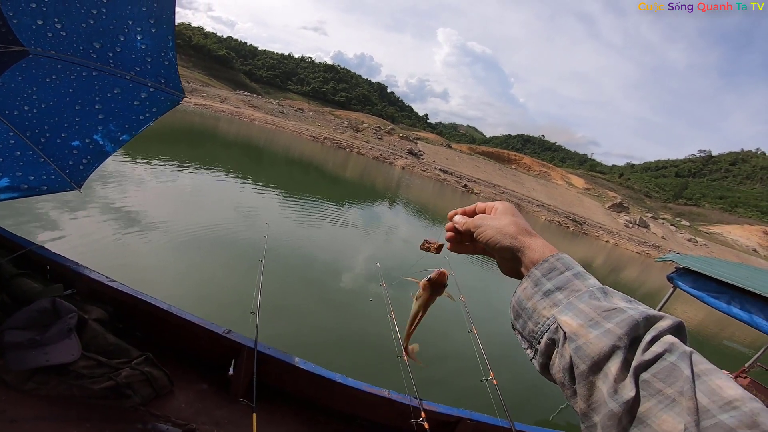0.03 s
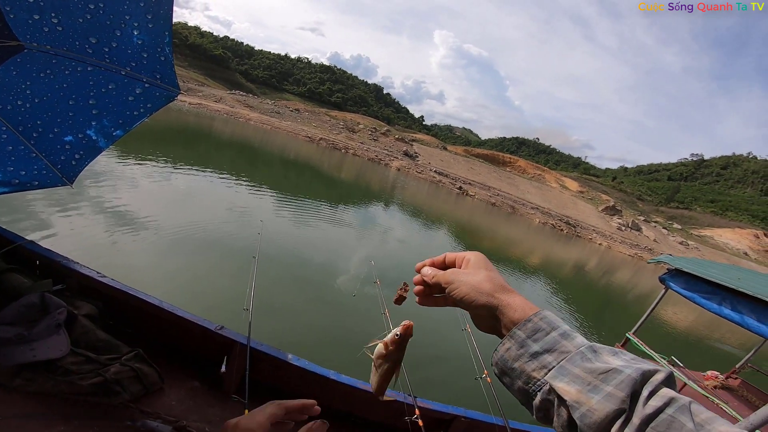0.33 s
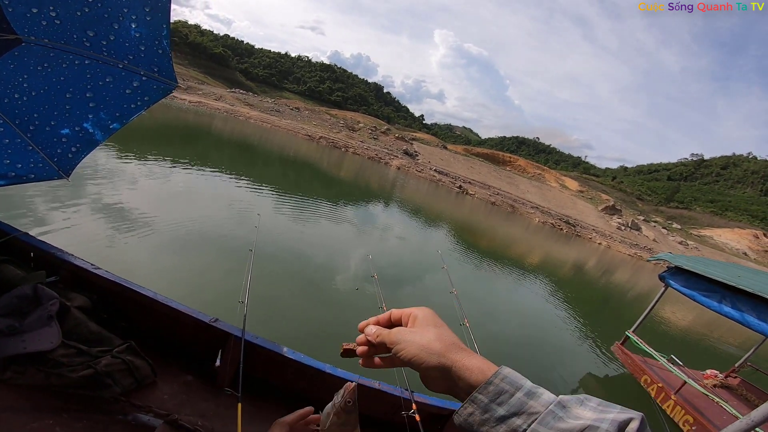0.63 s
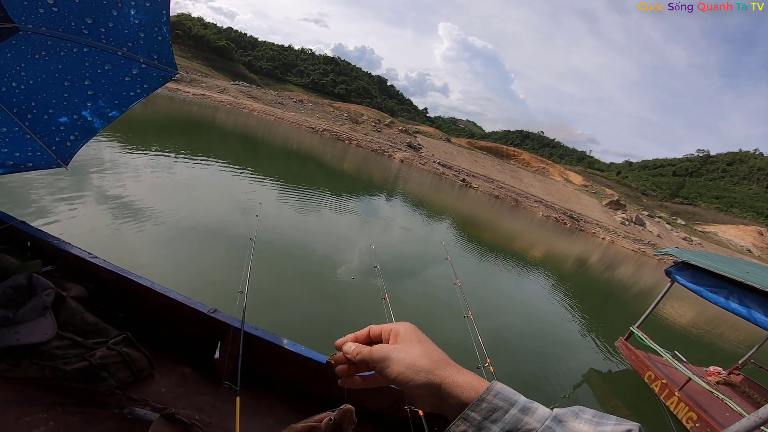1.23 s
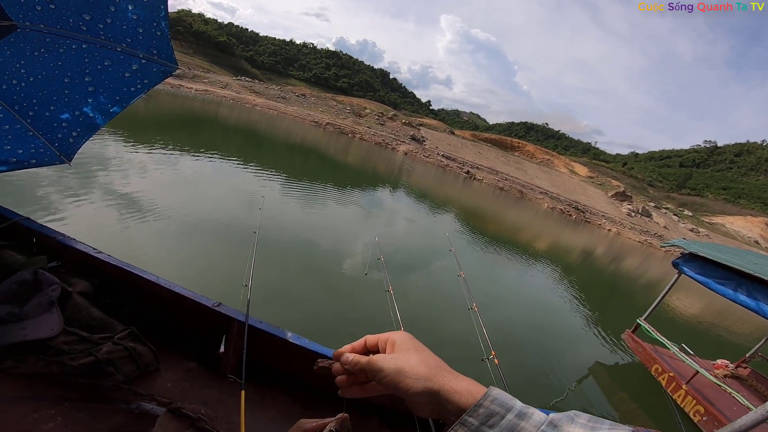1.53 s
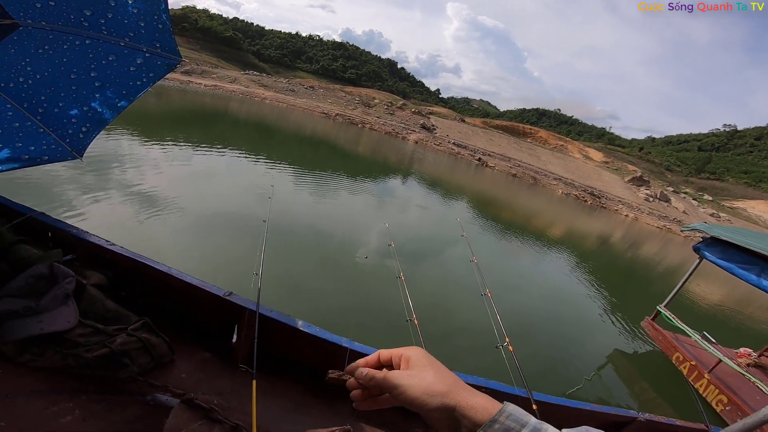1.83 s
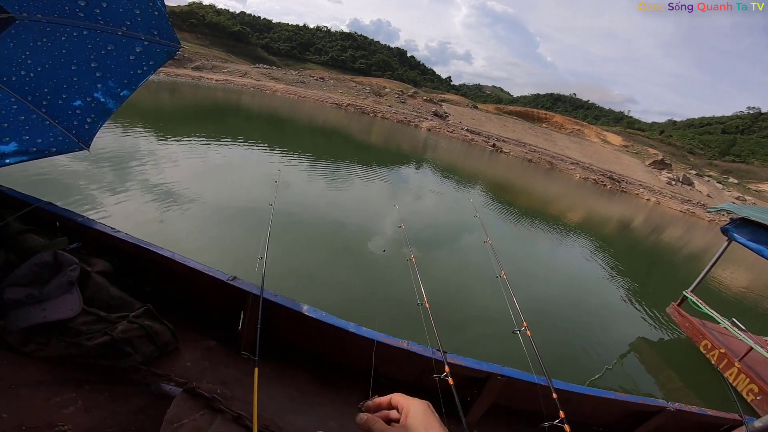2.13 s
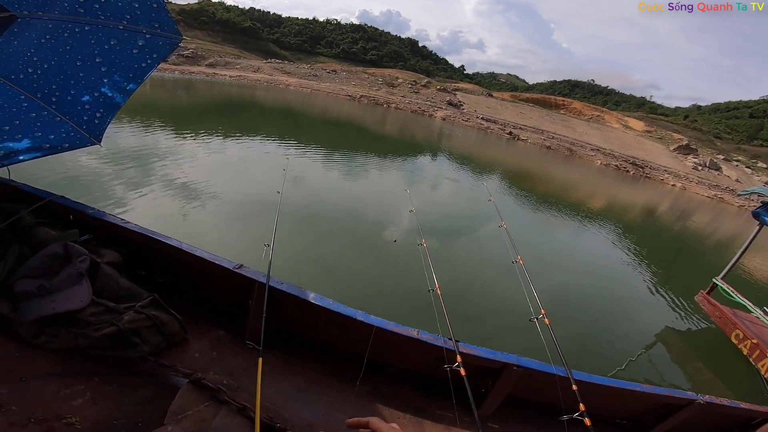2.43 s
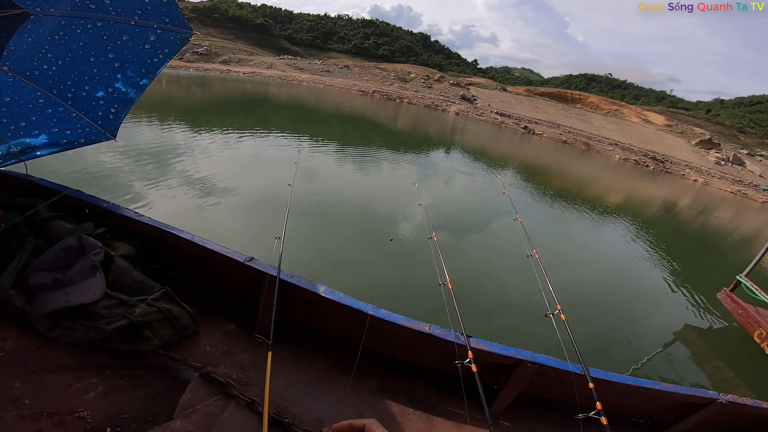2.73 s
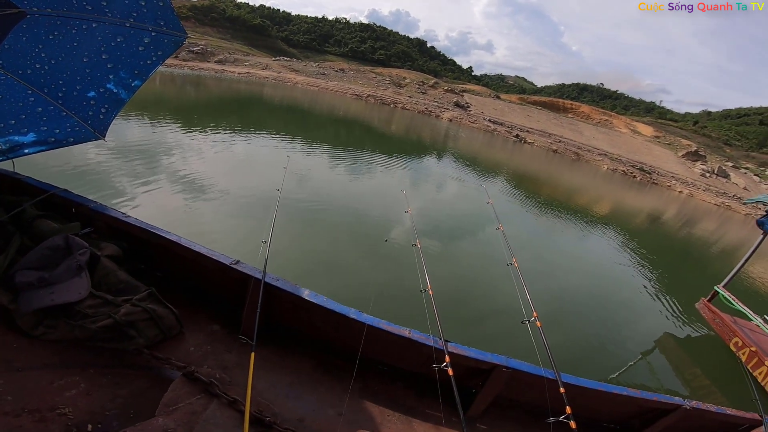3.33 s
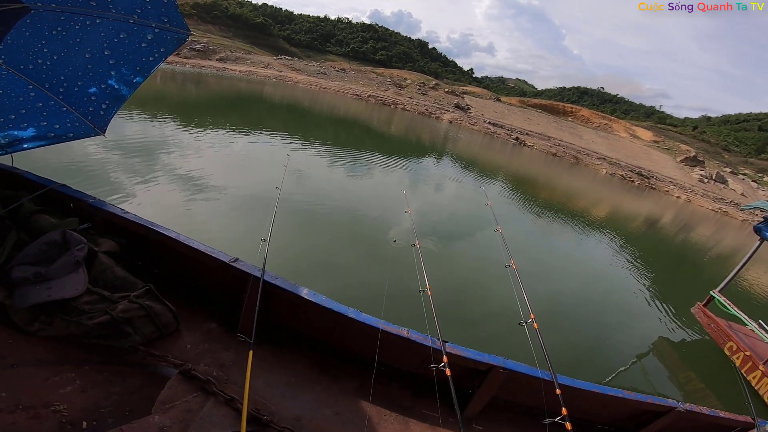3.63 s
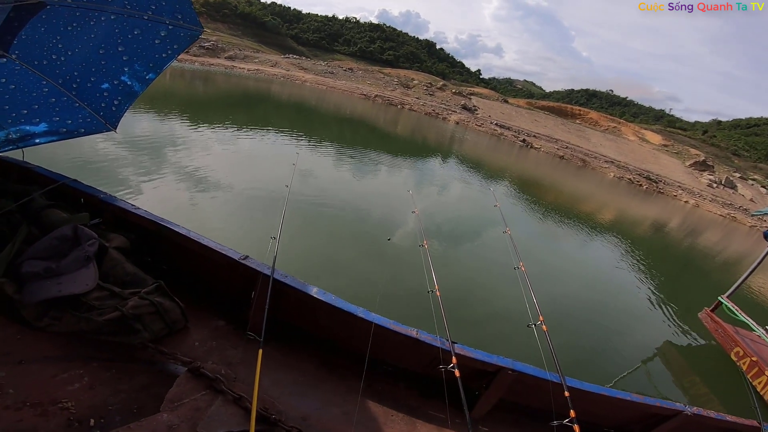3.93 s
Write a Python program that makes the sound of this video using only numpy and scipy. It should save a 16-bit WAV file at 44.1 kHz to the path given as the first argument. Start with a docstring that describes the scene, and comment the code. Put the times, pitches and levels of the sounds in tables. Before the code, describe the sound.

Short raspy croaks from a small catfish in hand, with wet finger ticks between.

```python
"""Light air, soft gusts and far insects surround a boat moored on a still reservoir.
A sleeve swishes, then a small catfish, just landed, slaps into the palm with a dull bump.
From 1.4 s it croaks seven times: each stroke of a fin spine drags ridges over their socket,
and the clicks ring its body. Fingers tick on the wet fish between and over the croaks."""
import sys
import numpy as np
from scipy import signal
from scipy.fft import rfft, irfft
from scipy.io import wavfile
from scipy.ndimage import uniform_filter1d

SR = 44100
rng = np.random.default_rng(int(sys.argv[2]) if len(sys.argv) > 2 else 0)


def int16_out(signal):
    """Quantize to a 16-bit WAV file."""
    q = np.round(np.clip(np.atleast_2d(signal).T, -1, 1) * 32767)
    wavfile.write(sys.argv[1], SR, q.astype(np.int16))


N = 176400

# spine strokes: start_s, swell_s, hold_s, level_db, first_rate_hz, loaded_rate_hz, last_rate_hz,
# body_pitch_hz, grip_damping_db, snap_db, skid_db
CROAK_STROKES = [(1.4015, 0.029, 0.01, 0, 225.5, 222.2, 334.5, 1014, 3.5, -3, -17),
                 (1.758, 0.028, 0.027, 0, 279, 226.4, 312.8, 982, 2.5, -4.5, -10.5),
                 (2.0034, 0.041, 0.028, 3, 288.8, 195.9, 320.6, 1068, 3, -7.5, -43),
                 (2.363, 0.042, 0.028, -1, 277.2, 205.7, 295.4, 1093, -1.5, 0, -18),
                 (2.6568, .041, .036, -2.5, 284.4, 202.5, 257, 1073, -1.3, 1.5, -20.5),
                 (3.1119, 0.041, 0.036, -1, 222.6, 206.7, 252.7, 1057, 0.5, -1.5, -10),
                 (3.7117, 0.038, .034, 0, 230.6, 200.4, 246.2, 1084, 1, -1.5, -14)]
# hollow ring of the fish's body when pitched at BODY_HZ: freq_hz, gain_db
BODY_RING = [(150, -50), (400, -17), (580, -17), (740, -13), (880, -1), (1060, 3.5), (1300, -2.5),
             (1550, -10), (1850, -24), (2300, -23.5), (3200, -31.5), (5000, -46), (12000, -68)]
# dry snap of one ridge: freq_hz, gain_db
RIDGE_SNAP = [(1000, -10), (2200, -10.5), (3300, -1.5), (4200, -9.5), (5400, -9.5), (7300, -16.5),
              (8800, -12), (10500, -22), (13000, -32)]
# higher ring of the spine skidding free: freq_hz, gain_db
SKID_RING = [(500, -68), (1200, -33), (1600, -0.5), (1900, 0.5), (2250, -3), (2700, -23), (4000, -22),
             (12000, -48)]
CROAK_DB, BODY_HZ = 10.5, 1080
START_DB, SAG_DB, RELEASE_DB, RELEASE_S, FADE_DB_PER_S = -17.5, -3, -8.5, 0.036, -290
RIDGE_SCATTER_DB, RIDGE_JITTER, SLIP_JITTER = .8, .02, .10
SNAP_DB, SNAP_DECAY_S, EDGE_SOFT_HZ, EDGE_HARD_HZ = -22.5, 0.00045, 5300, 7700
RASP_DB, RASP_DECAY_S = -4, 0.0054


def croak(start, swell, hold, db, first_hz, loaded_hz, last_hz, body_hz, grip_db, snap_db, skid_db):
    """One stroke of the spine: it slows as it presses in, then speeds up and skids as it lets go."""
    pushes, snaps, skids = np.zeros((3, N))
    age = 0
    for timing, strength in rng.standard_normal((40, 2)):  # one click per ridge
        loose = np.clip((age - swell) / hold, 0, 1)
        released_s = max(age - swell - hold, 0)
        press_db = START_DB * max(1 - age / swell, 0) ** 2.43 + SAG_DB * loose ** 2
        fade_db = RELEASE_DB * min(released_s / RELEASE_S, 1) + FADE_DB_PER_S * released_s
        force = undb(press_db + fade_db + RIDGE_SCATTER_DB * strength)
        dry_snap = undb(-5 * loose) * burst(SNAP_DECAY_S, size=512)
        wet_rasp = undb(RASP_DB) * burst(RASP_DECAY_S, size=512)
        # the edge brightens as the spine presses in
        edge_hz = EDGE_SOFT_HZ + (EDGE_HARD_HZ - EDGE_SOFT_HZ) * min(age / swell, 1) ** 2
        pole = np.exp(-2 * np.pi * edge_hz / SR)
        crack = signal.lfilter([(1 - pole) ** 2], [1, -2 * pole, pole ** 2], dry_snap + wet_rasp)
        add(pushes, start + age, np.array([force]))
        add(snaps, start + age, force * crack)
        add(skids, start + age, force * loose * burst(decay_s=0.003, size=256))
        rate_hz = np.interp(age, [swell / 4, swell * .85, swell + hold], [first_hz, loaded_hz, last_hz])
        jitter = RIDGE_JITTER + SLIP_JITTER * loose ** 2
        age += max(1 + timing * jitter, .5) / rate_hz
    # a tighter grip shaves the peak off the body's resonance
    gripped = [(hz, gain - grip_db * np.exp(gain / 7)) for hz, gain in BODY_RING]
    body = ring(pushes, gripped, stretch=body_hz / BODY_HZ)
    snap = undb(SNAP_DB + snap_db) * ring(snaps, RIDGE_SNAP)
    skid = undb(skid_db) * ring(skids, SKID_RING)
    return undb(db) * (body + snap + skid)


# palm and fingers on the fish: start_s, level_db, decay_s, body_send_db, crisp_db, crisp_pitch_hz
TOUCHES = [(.579, 2.5, .009, -32, -2.5, 8300), (.600, -1, 0.024, -29, 9, 4120),
           (1.234, -13, 0.04, -20, 11.5, 3940), (1.968, -1.5, 0.02, -15, -1.5, 7500),
           (2.345, -23, 0.0011, 0, 9.5, 6600), (2.551, -16, .003, 19.5, -6, 3000),
           (3.043, -12, .002, -5, -6, 3020), (3.055, -4.5, 0.011, 4.5, -6, 5070),
           (3.325, -6.5, 0.0027, -7, -7, 3000), (3.336, -3, 0.012, -6, 2, 3900),
           (3.596, -1.5, 0.02, 4, 4, 5630), (3.7115, 3.5, 0.0013, 4.5, 3, 5330)]
# tone of wet skin: freq_hz, gain_db
SKIN_TONE = [(300, -20.5), (1000, -10.5), (1550, -7), (2050, 5), (2600, -19), (4000, -19.5), (13000, -58)]
# crisp edge of a touch when pitched at CRISP_HZ: freq_hz, gain_db
CRISP_EDGE = [(800, -44), (2200, -8.5), (3200, -19.5), (4400, -22.5), (5800, -19), (7200, -27),
              (9300, -40.5), (13000, -61)]
TICK_DB, CRISP_HZ, CRISP_DECAY_S = -9, 5800, 0.012


def wet_ticks():
    """The slap and finger ticks: short wet contacts with a crisp edge; some also ring the body."""
    skin, body, edges = np.zeros((3, N))
    for start, db, decay_s, body_db, crisp_db, crisp_hz in TOUCHES:
        touch = undb(db) * burst(decay_s)
        add(skin, start, touch)
        add(body, start, undb(body_db) * touch)
        edge = np.zeros(N)
        add(edge, start, undb(db + crisp_db) * burst(CRISP_DECAY_S))
        edges += ring(edge, CRISP_EDGE, stretch=crisp_hz / CRISP_HZ)
    return undb(TICK_DB) * (ring(skin, SKIN_TONE) + ring(body, BODY_RING) + edges)


# tone of sliding cloth: freq_hz, gain_db
CLOTH_TONE = [(100, -18), (170, 11), (450, -10.5), (1300, -3.5), (2000, -3), (3500, -9.5), (6500, -21.5),
              (9000, -24.5), (13000, -46.5)]
SLEEVE_DB, SLEEVE_PEAK_S, SLEEVE_RISE_S, SLEEVE_FALL_S = -52.5, .455, .1, .07


def sleeve(t):
    """Cloth slides as the arm comes down: one fluttering swish."""
    from_peak = np.maximum((SLEEVE_PEAK_S - t) / SLEEVE_RISE_S, (t - SLEEVE_PEAK_S) / SLEEVE_FALL_S)
    cloth = noise(CLOTH_TONE, channels=1)[0]
    level = undb(SLEEVE_DB + 1.3 * wander(rate_hz=57.5))
    return cloth * level / (1 + from_peak + from_peak ** 2)


# soft handling bumps: peak_s, width_s, level_db
BUMP_HITS = [(0.623, 0.044, -47.5), (3.077, 0.008, -48), (3.41, 0.022, -55)]
# their dull low end: freq_hz, gain_db
BUMP_TONE = [(20, -15), (38, 8.5), (75, -21), (160, -1), (300, -10.5), (600, -28.5), (2000, -37),
             (8000, -97)]


def handling_bumps(t):
    """Handling makes brief, rounded swells of low rumble."""
    swells = sum(undb(db) * np.exp(-((t - peak) / width) ** 2 / 2) for peak, width, db in BUMP_HITS)
    return noise(BUMP_TONE) * swells


# stereo image at the two microphone ports: freq_hz, left_minus_right_db, left_lead_rad
PORT_IMAGE = [(100, 0, 1.0), (400, -6, 2.7), (700, -3.5, 2.35), (1000, -1.8, 2.15), (2000, -.8, 1.55),
              (3300, -2.5, .9), (5300, -13, 0), (12000, -15, 0)]
# treble scattered around the hands, different on each side: freq_hz, gain_db
SCATTER_TONE = [(500, -45), (1300, -37), (2200, -3.5), (4500, 5.5), (13000, 13)]
HULL_DB, HULL_T60_S, AWNING_DB, AWNING_T60_S = -8.5, 0.12, -33, 0.45
SCATTER_DB, SCATTER_T60_S = -7, .025


def boat_reflections(x):
    """Close sound and hull reflections reach both ports; treble scatters, the awning adds a faint tail."""
    def echo(t60_s):
        return signal.fftconvolve(x, burst(t60_s / np.log(1000), size=16384))[:N]

    near = rfft(x + undb(HULL_DB) * echo(HULL_T60_S))
    balance = undb(curve(PORT_IMAGE) / 2)
    lead_rad = curve(PORT_IMAGE, column=2)
    ports = irfft(np.array([near * balance * np.exp(1j * lead_rad), near / balance]), N)
    scatter = ring(np.array([echo(SCATTER_T60_S) for _ in range(2)]), SCATTER_TONE)
    awning = np.array([echo(AWNING_T60_S) for _ in range(2)])
    return ports + undb(SCATTER_DB) * scatter + undb(AWNING_DB) * awning


# bed of open air: freq_hz, gain_db
AIR_TONE = [(60, -4.5), (85, -15), (115, -20), (152, 6.5), (220, -1.5), (300, -9), (520, -16), (780, -9),
            (1050, -17), (2000, -21), (3600, -25.5), (5200, -26.5), (6500, -34), (10000, -39),
            (11200, -60.5)]
# wind rumble on the ports: freq_hz, gain_db
WIND_TONE = [(15, -5), (34, 4), (50, -9.5), (75, -29.5), (200, -59), (2000, -83)]
# rise and fall of the wind: time_s, level_db
WIND_RIDE = [(0.0, -52), (0.04, -62), (0.59, -53), (0.62, -42), (0.77, -61), (0.82, -45.5), (1.04, -73.5),
             (1.38, -50.5), (1.43, -70), (2.17, -56), (2.31, -66), (2.42, -45.5), (2.56, -59), (3.51, -63),
             (3.53, -62.5), (4.0, -41)]
# thin band of far insects: freq_hz, gain_db
INSECT_TONE = [(3800, -31.5), (4400, -9.5), (4850, 1.5), (5200, -34.5), (6000, -34.5)]
AIR_DB, AIR_SWELL_DB, GUST_DB, INSECT_DB, OUTDOOR_PAN_DB = -58.5, 1.52, 2.5, -77, -1


def outdoors(t):
    """Quiet air, light gusts on the ports and steady far insects, all leaning slightly right."""
    air = noise(AIR_TONE) * undb(AIR_DB + AIR_SWELL_DB * wander(rate_hz=7))
    wind_db = np.interp(t, *np.array(WIND_RIDE).T)
    wind = noise(WIND_TONE) * undb(wind_db + GUST_DB * wander(rate_hz=5.72))
    insects = undb(INSECT_DB) * noise(INSECT_TONE)
    pan = undb(np.array([[OUTDOOR_PAN_DB], [-OUTDOOR_PAN_DB]]) / 2)
    return (air + wind + insects) * pan


def undb(db):
    """Decibels to gain."""
    return 10 ** (np.asarray(db) / 20)


def unit(x):
    """Scale to rms 1."""
    return x / np.sqrt(np.mean(x ** 2))


def curve(table, column=1):
    """One column of a table, joined over log frequency."""
    rows = np.array(table, float)
    freq_hz = np.arange(N // 2 + 1) * SR / N
    return np.interp(np.log(freq_hz + 1), np.log(rows[:, 0]), rows[:, column])


def ring(x, table, stretch=1):
    """Minimum-phase EQ from freq_hz, gain_db rows, shifted in pitch by stretch."""
    gain = undb(curve([(hz * stretch, db) for hz, db in table]))
    cepstrum = irfft(np.log(gain), N)
    cepstrum[1:N // 2] *= 2
    cepstrum[N // 2 + 1:] = 0
    return irfft(rfft(x) * np.exp(rfft(cepstrum)), N)


def noise(table, channels=2):
    """Coloured noise, unrelated in each channel."""
    return unit(ring(rng.standard_normal((channels, N)), table))


def wander(rate_hz):
    """Smooth random drift with a spread near 1."""
    span = int(SR / rate_hz)
    steps = np.repeat(rng.standard_normal(N // span + 1), span)
    return unit(uniform_filter1d(uniform_filter1d(steps, span), span)[:N])


def burst(decay_s, size=4096):
    """Fading noise of unit energy."""
    x = rng.standard_normal(size) * np.exp(-np.arange(size) / SR / decay_s)
    return x / np.linalg.norm(x)


def add(out, at_s, x):
    """Mix x into out at a time."""
    i = int(at_s * SR)
    out[i:i + len(x)] += x[:max(N - i, 0)]


def scene():
    """The fish and the hands up close in the boat, with the reservoir behind."""
    t = np.arange(N) / SR
    croaks = undb(CROAK_DB) * sum(croak(*stroke) for stroke in CROAK_STROKES)
    return boat_reflections(croaks + wet_ticks() + sleeve(t)) + handling_bumps(t) + outdoors(t)


def record(dry):
    """A steep high cut at 13 kHz."""
    return signal.sosfilt(signal.ellip(8, .2, 70, 13000, fs=SR, output="sos"), dry)


dry = scene()
out = record(dry)
int16_out(out)
```